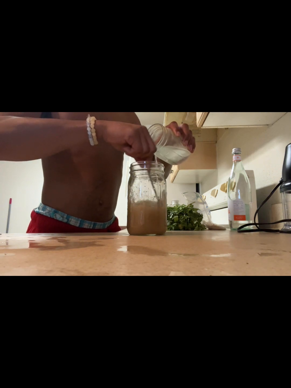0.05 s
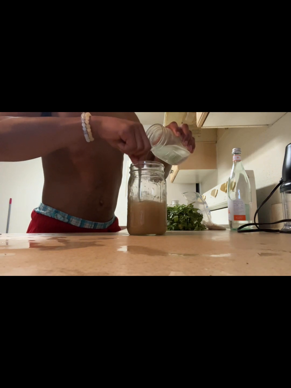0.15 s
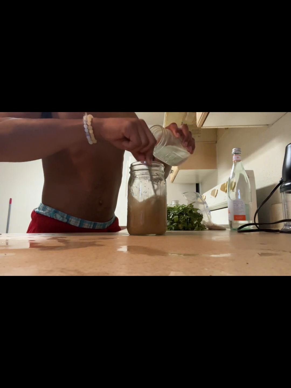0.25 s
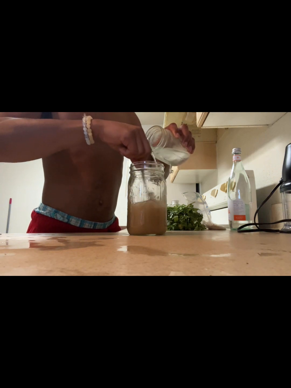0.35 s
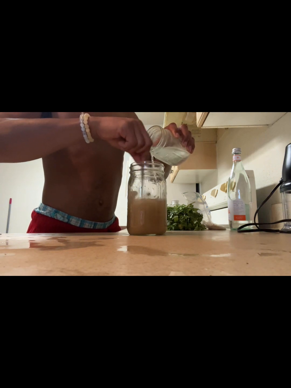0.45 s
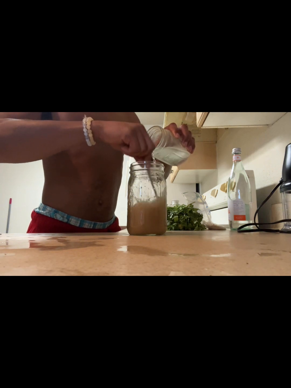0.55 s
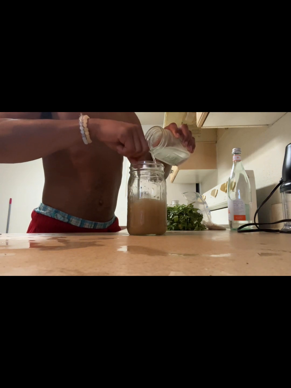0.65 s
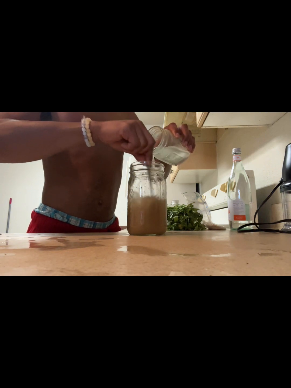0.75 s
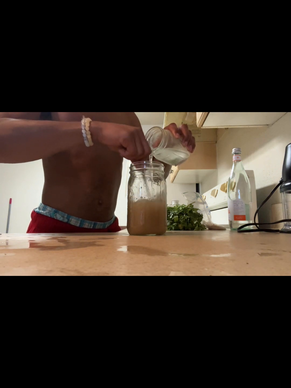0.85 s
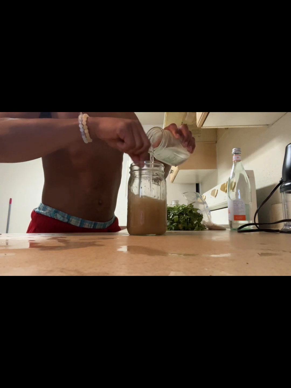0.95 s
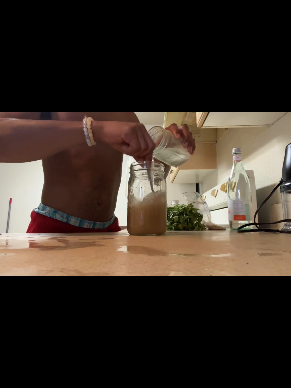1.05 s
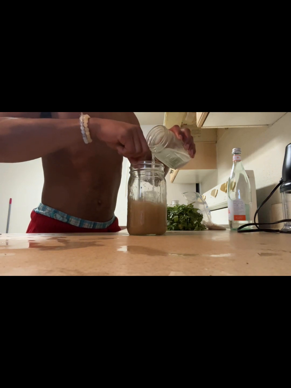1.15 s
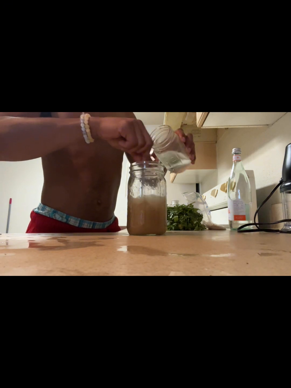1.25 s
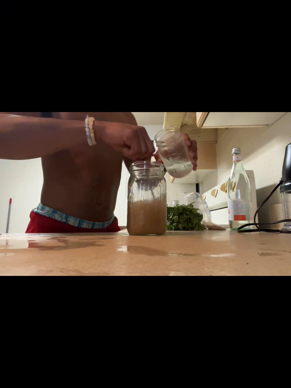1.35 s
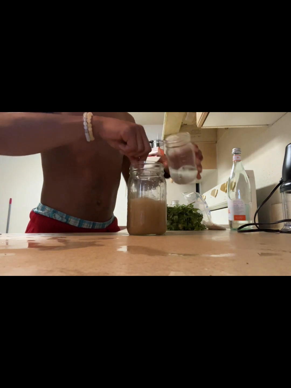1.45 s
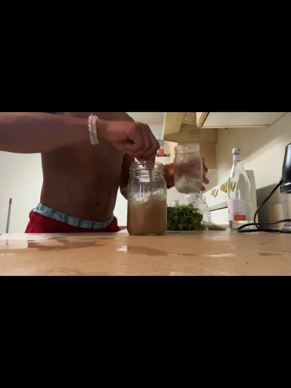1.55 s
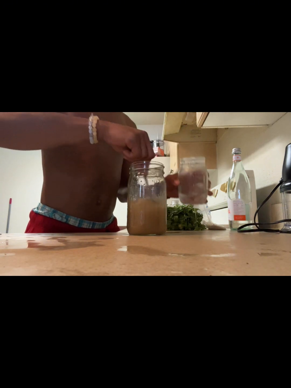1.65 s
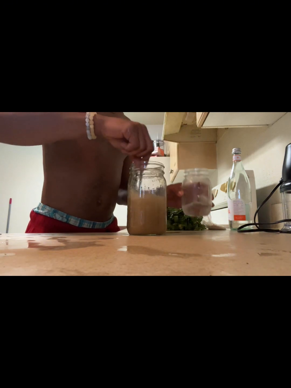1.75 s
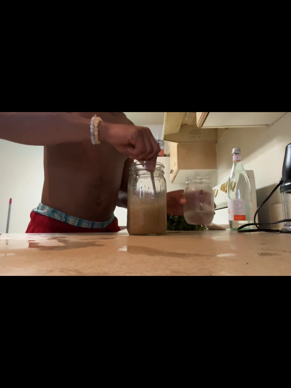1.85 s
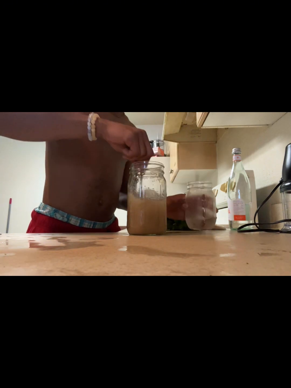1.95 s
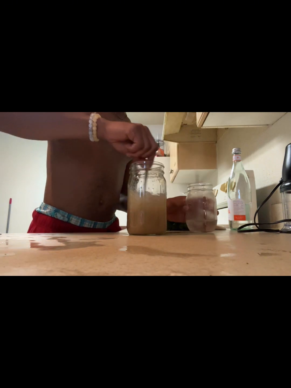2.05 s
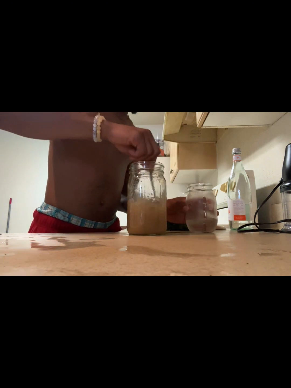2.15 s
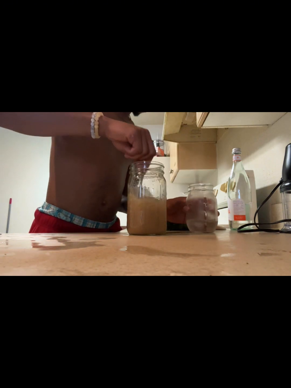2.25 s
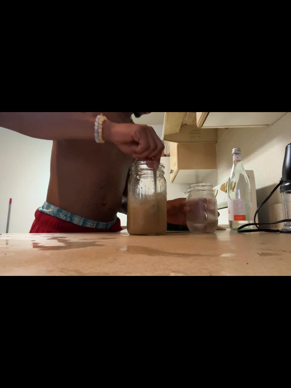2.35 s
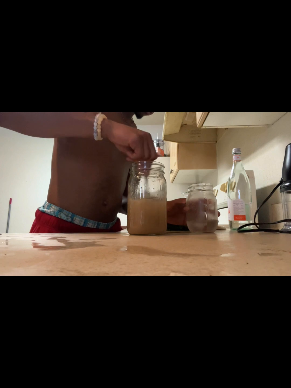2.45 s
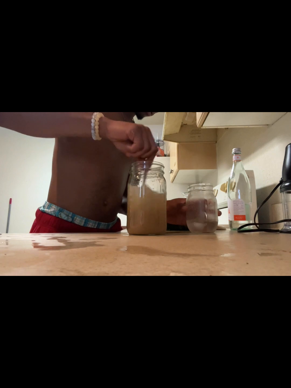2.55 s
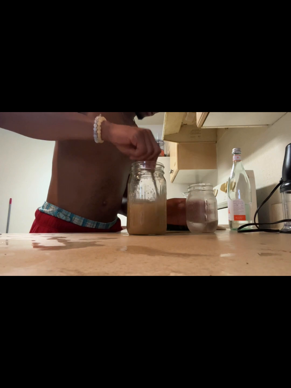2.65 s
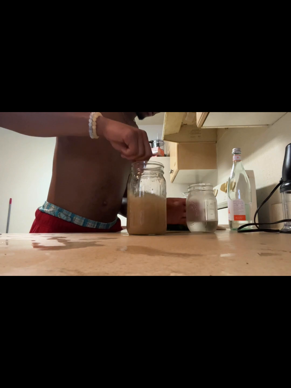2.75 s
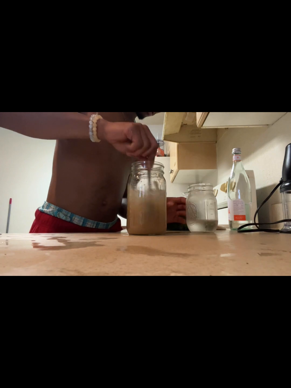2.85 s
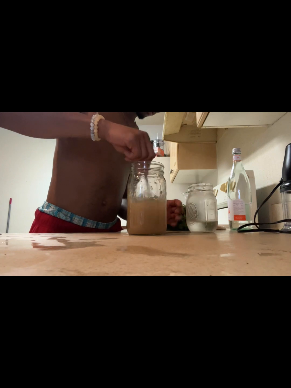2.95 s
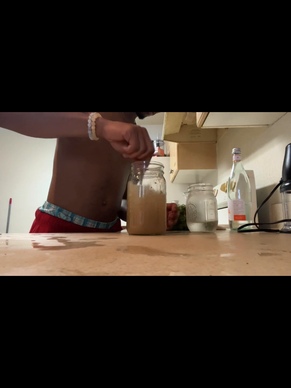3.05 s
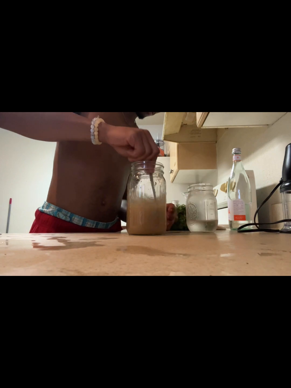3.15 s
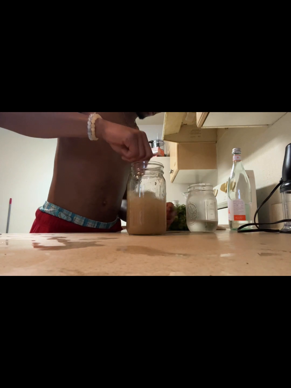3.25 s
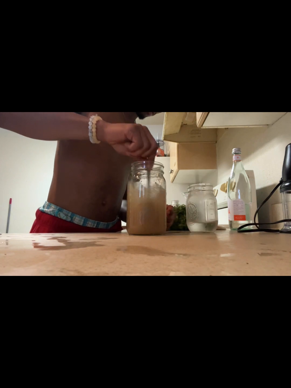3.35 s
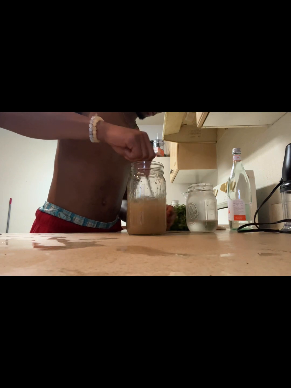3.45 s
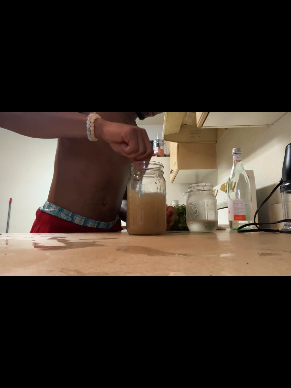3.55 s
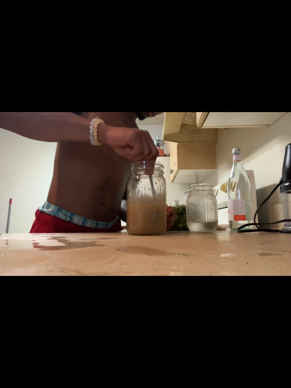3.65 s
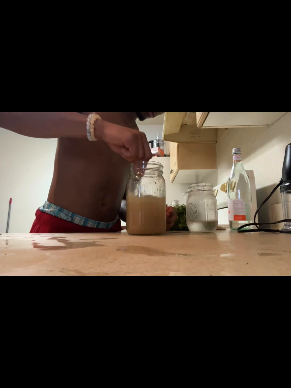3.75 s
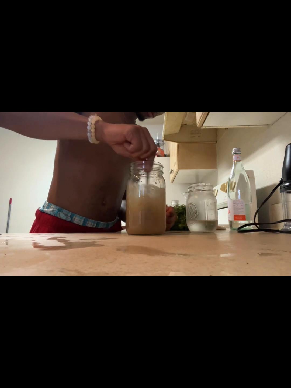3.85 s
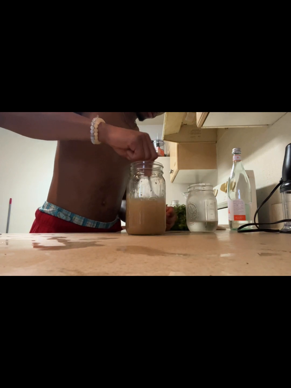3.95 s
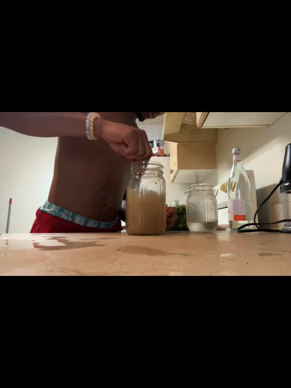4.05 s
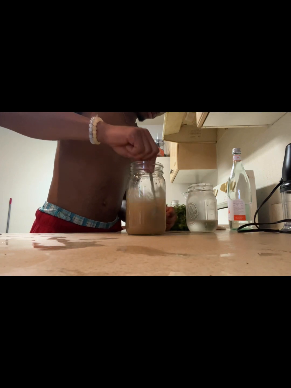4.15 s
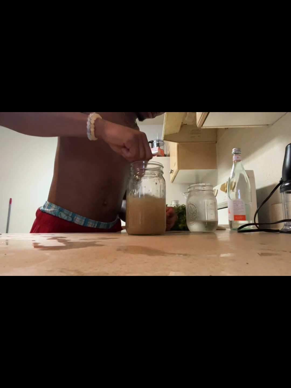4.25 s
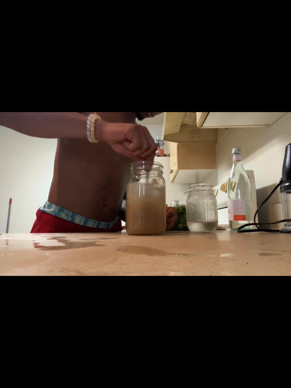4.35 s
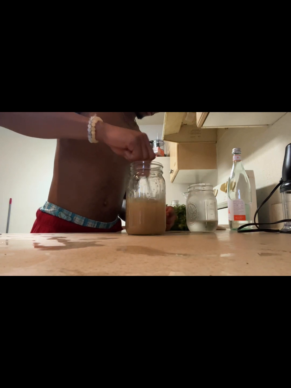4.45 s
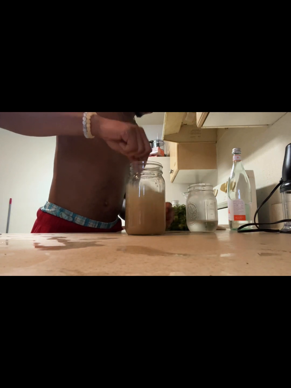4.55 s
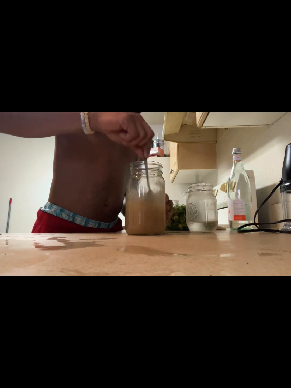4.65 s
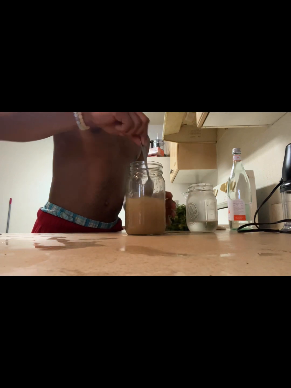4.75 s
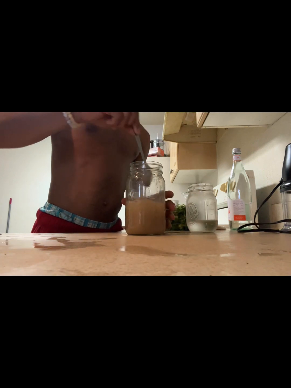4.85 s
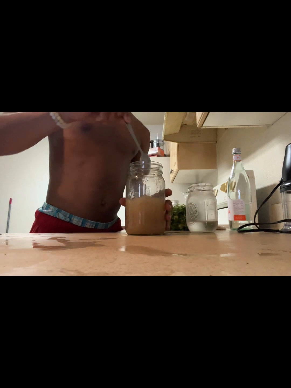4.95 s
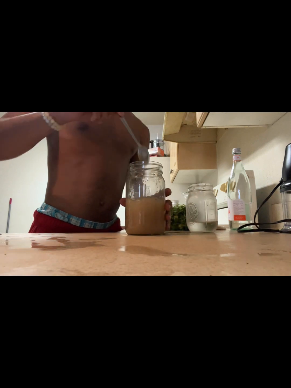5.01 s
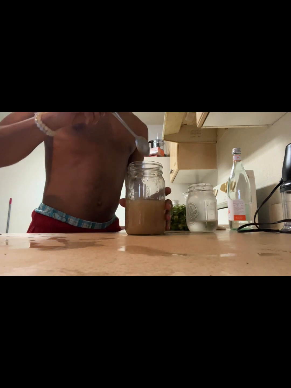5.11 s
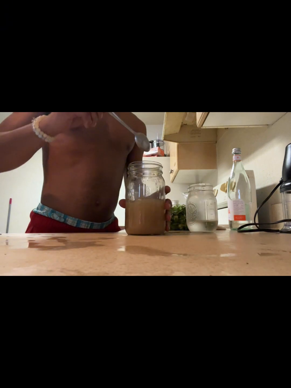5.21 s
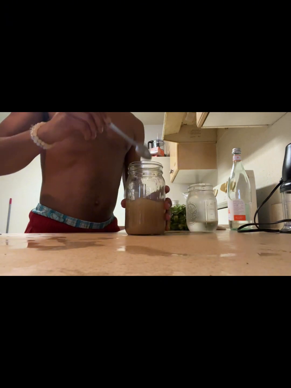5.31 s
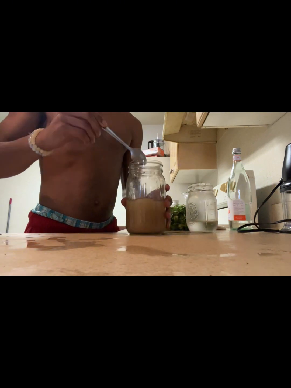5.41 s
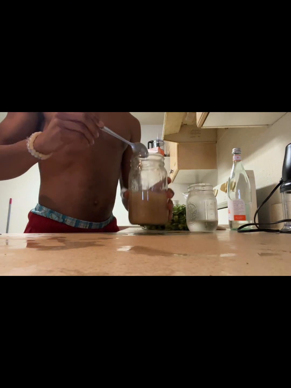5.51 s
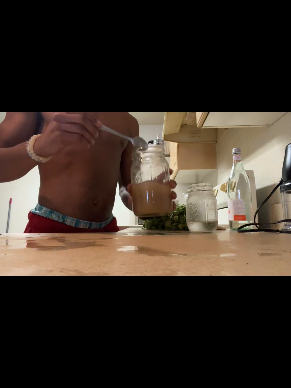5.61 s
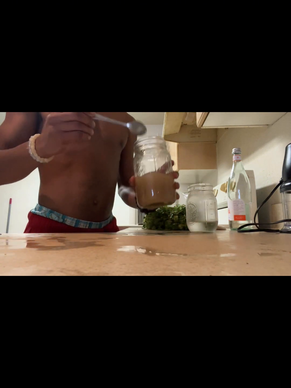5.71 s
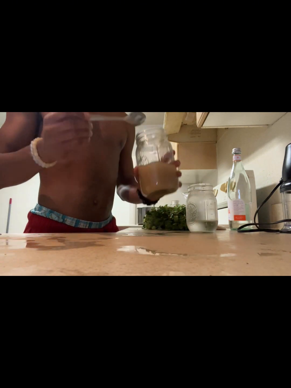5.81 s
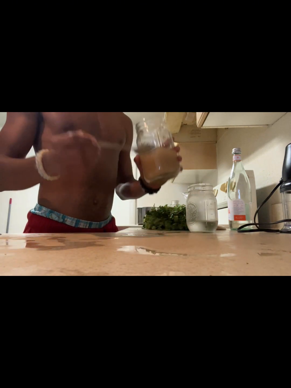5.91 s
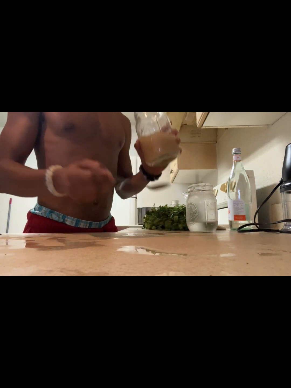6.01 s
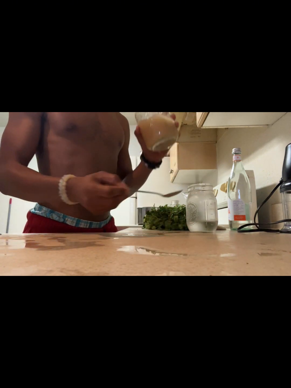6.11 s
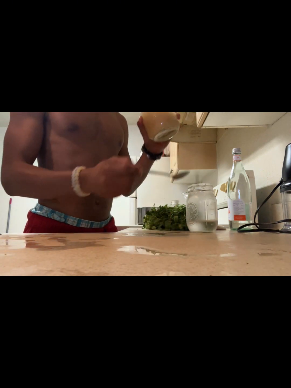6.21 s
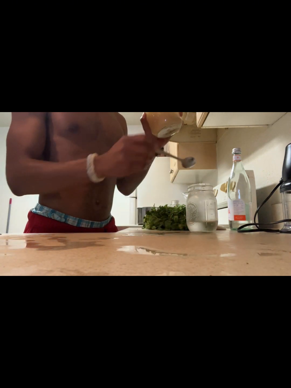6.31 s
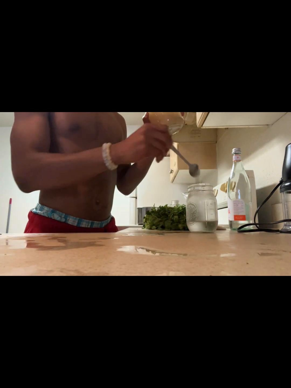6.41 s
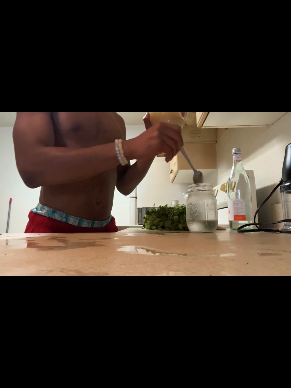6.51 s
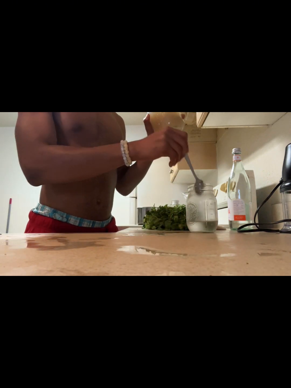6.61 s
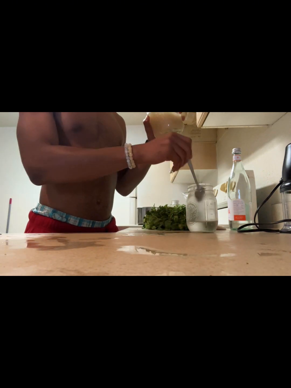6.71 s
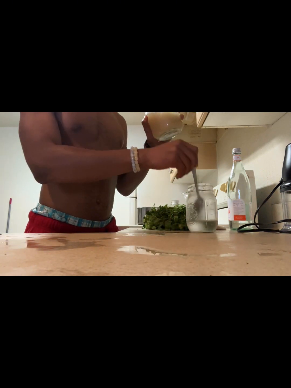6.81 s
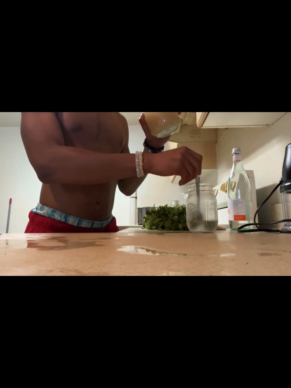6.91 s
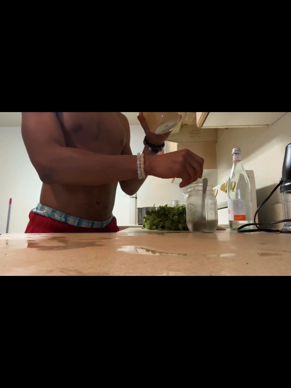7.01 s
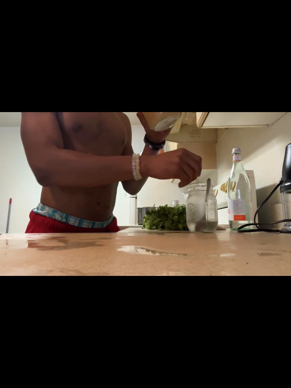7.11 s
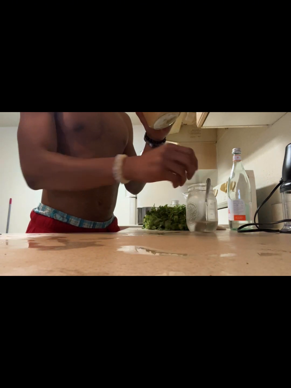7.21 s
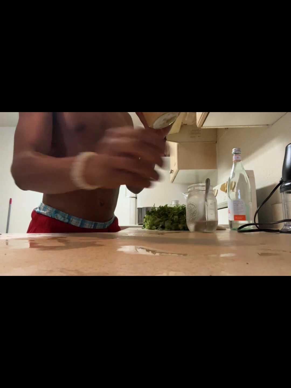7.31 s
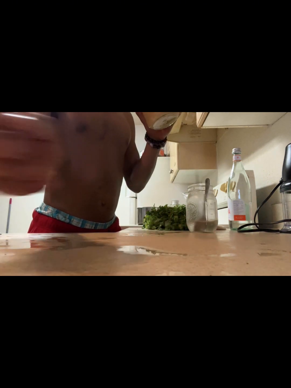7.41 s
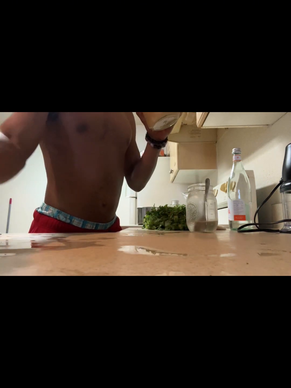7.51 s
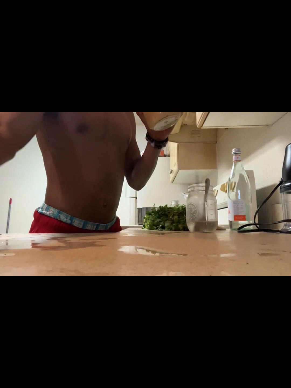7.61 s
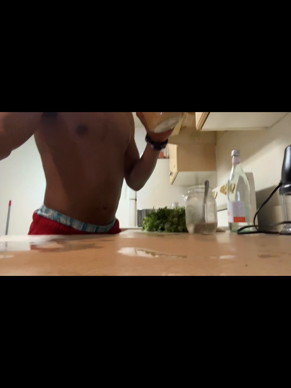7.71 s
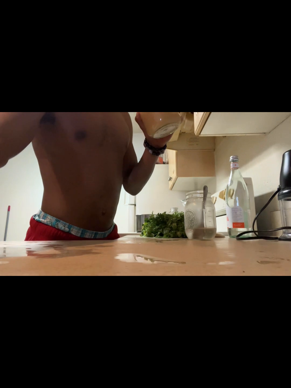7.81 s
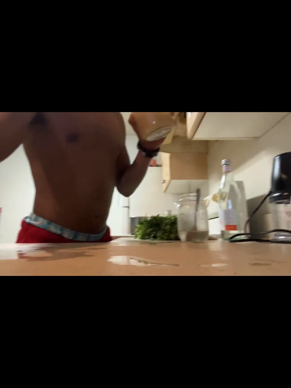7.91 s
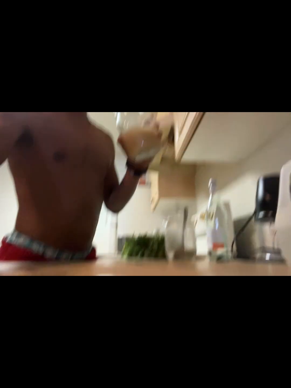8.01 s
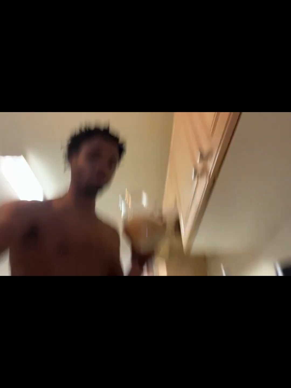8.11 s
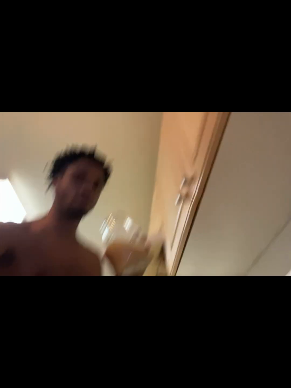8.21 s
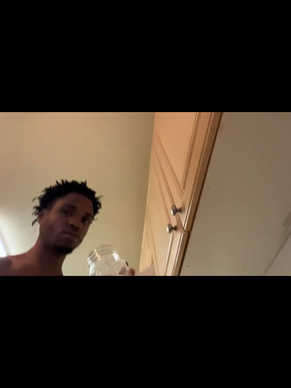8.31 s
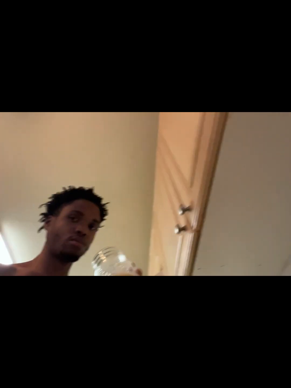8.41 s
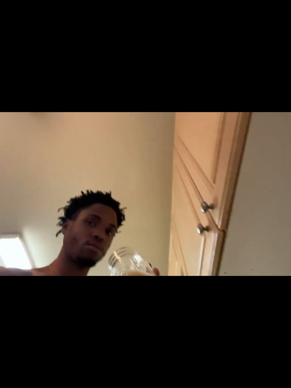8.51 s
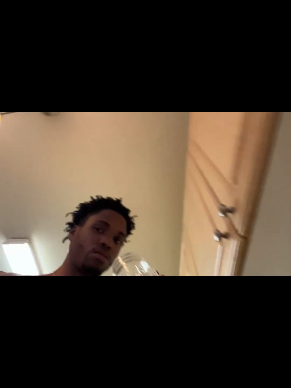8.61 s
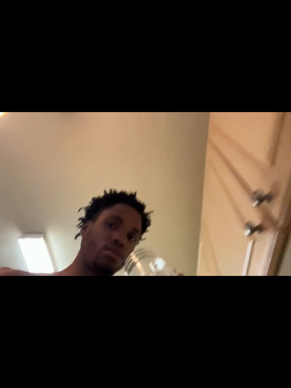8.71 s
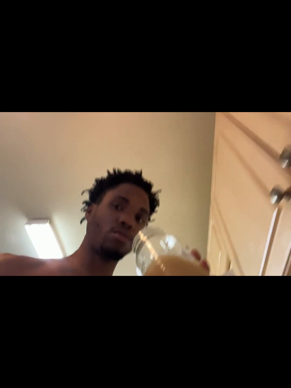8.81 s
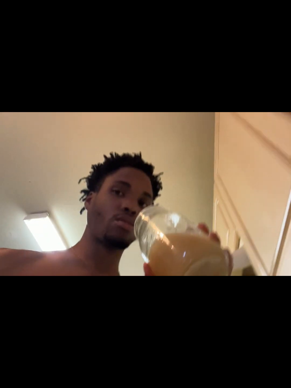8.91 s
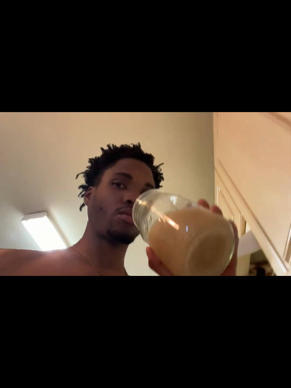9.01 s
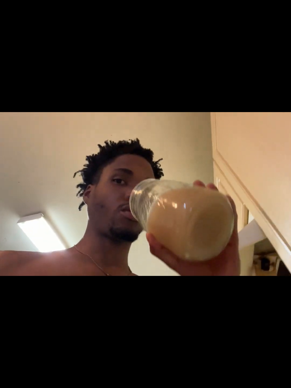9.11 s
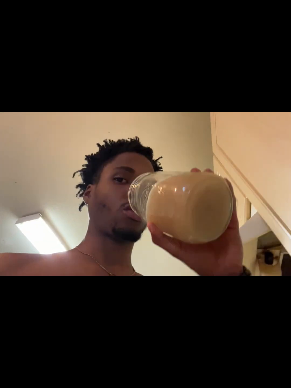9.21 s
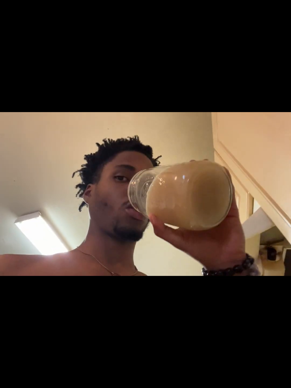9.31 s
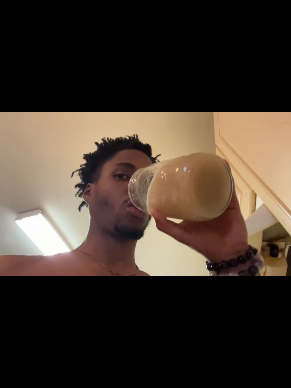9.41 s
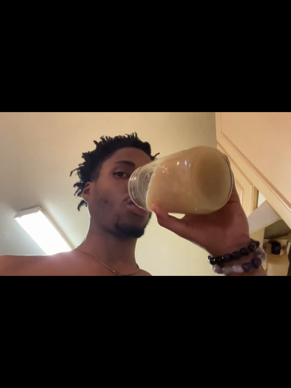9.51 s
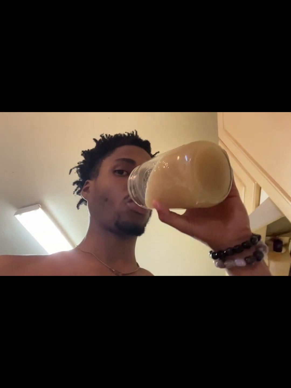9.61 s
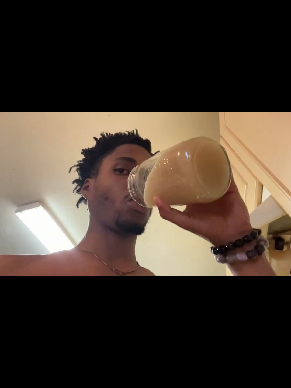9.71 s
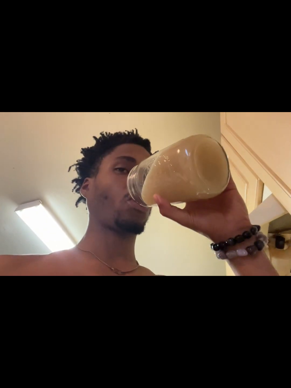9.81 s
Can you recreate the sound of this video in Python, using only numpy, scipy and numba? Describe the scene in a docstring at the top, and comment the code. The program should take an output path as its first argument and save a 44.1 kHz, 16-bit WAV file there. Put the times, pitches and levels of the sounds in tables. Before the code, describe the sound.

A phone microphone resting on the counter hears short, damped glass clinks growing denser, gritty scraping and woody thuds as a jar of drink is stirred. A dull wet clunk and two clearer rim taps follow, then a near-quiet gap with low fridge hum. The spoon bounces brightly in an empty jar and is abruptly damped. Rough handling rubs and clicks come next, then soft room tone in the small kitchen.

```python
"""Heard first: a spoon stirring a thick drink in a glass jar on a kitchen counter, close to a phone on the same counter.
It clinks and scrapes on the damped glass, knocks through the counter, clunks up the wet wall, taps the rim,
then drops into an empty jar and rattles; a hand drags the phone up off the counter. Blows ring banks of decaying
modes, friction is shaped noise, knocks are falling thumps. Behind it a fridge hums in the small hard room.
Two microphones hear the jars, the case and the air, each with its own balance, likeness and phase."""
import sys
import numpy as np
from scipy import signal
from scipy.fft import rfft, irfft, next_fast_len
from scipy.io import wavfile
from scipy.ndimage import uniform_filter1d, minimum_filter1d
from numba import njit

SR = 44100
rng = np.random.default_rng(int(sys.argv[2]) if len(sys.argv) > 2 else 0)


def generate_wav(sig):
    """Save sig (samples, or channels by samples) to the path in sys.argv[1] as 16-bit PCM at SR."""
    pcm = np.round(np.clip(np.atleast_2d(sig).T, -1, 1) * 32767).astype(np.int16)
    wavfile.write(sys.argv[1], SR, pcm)


N = 434815
T = np.arange(N) / SR
M = next_fast_len(N)
HZ = np.fft.rfftfreq(M, 1 / SR)


def undb(db):
    """Amplitude factor of a level in dB."""
    return 10 ** (np.asarray(db) / 20)


def unit(x):
    """The same sound at rms 1."""
    return x / np.sqrt(np.mean(x ** 2))


def filtered(x, response):
    """Multiply the spectrum of x by a response given at HZ."""
    return irfft(rfft(x, M) * response, M)[:, :N]


def over_hz(table):
    """A table of (hz, value) read on a log-frequency axis."""
    hz, value = np.transpose(table)
    return np.interp(np.log(HZ + 20), np.log(hz + 20), value)


def noise(gain):
    """Two unrelated noises of one colour, rms 1."""
    return unit(filtered(rng.standard_normal((2, M)), gain))


def band(lo_hz, hi_hz):
    """Gain of a smooth band between two edges."""
    return 1 / np.sqrt((1 + (lo_hz / (HZ + 1)) ** 8) * (1 + (HZ / hi_hz) ** 8))


def walk(rate_hz):
    """Random levels held for 1 / rate_hz seconds, then slewed; spread near 1."""
    hold = int(SR / rate_hz)
    steps = np.repeat(rng.standard_normal(N // hold + 1), hold)
    return uniform_filter1d(steps, hold)[:N]


def add(out, start_s, wave):
    """Mix a short stereo wave into out."""
    i = int(start_s * SR)
    out[:, i:i + wave.shape[1]] += wave[:, :N - i]


@njit
def ring(x, hz, gain, t60):
    """A bank of decaying modes driven by x."""
    y = np.zeros(len(x))
    for k in range(len(hz)):
        turn = np.exp((2j * np.pi * hz[k] - np.log(1000) / t60[k]) / SR)
        state = 0j
        for i in range(len(x)):
            state = state * turn + x[i] + 1e-18
            y[i] += gain[k] * state.imag
    return y


# colour of spoon-on-glass contact noise: hz, level_db (density per Hz)
CONTACT_COLOUR = [(240, -34.5), (400, -7.5), (719, 5), (1060, -4.5), (1440, -10), (1820, -0.5),
                  (2120, -6.5), (2550, -4), (3420, -10.5), (4050, -15.5), (6850, -16.5), (9320, -43.5),
                  (16000, -60)]


def strikes(events, modes, swell_s, contact_s, crack_db, tail_t60, scatter_db, detune, focus_db,
            length_s, damping_db, skip_db):
    """Each blow starts softly, lands elsewhere and chatters for a few ms: new mode strengths, a detune, contact noise."""
    hz, db, t60 = np.transpose(modes)
    lead = 220  # samples of soft onset before the peak
    t = np.arange(-lead, int(length_s * SR)) / SR
    after = np.maximum(t, 0)
    edges = [(400, 1250), (1250, 3700), (3700, 16000)]  # low, middle, high part in Hz
    parts = np.zeros((3, 2, N))
    cracks = [noise(undb(over_hz(CONTACT_COLOUR)) * band(*e)) for e in edges]
    swell = np.exp(np.minimum(t, 0) / swell_s - after / contact_s)
    chatter = swell + 0.64 * (after / 0.00029) * np.exp(1 - after / 0.00037)
    drag = np.minimum(after / contact_s, 1) * undb(-60 * after / tail_t60)
    grain = undb(skip_db * walk(180))  # the spoon skips along in uneven small contacts
    for start_s, peak_db, low_db, high_db, ring_hz in events:
        i = int(start_s * SR) - lead
        here = slice(i, i + len(t))
        skips = drag * grain[here]
        burst = undb(crack_db) * (chatter + 0.22 * skips)
        blows = (chatter + 0.11 * skips) * rng.standard_normal((2, len(t)))
        blows += 6.1 * (t == 0)  # one hard impulse at the peak
        pitch_chance, level_chance, damping_chance = rng.standard_normal((3, len(hz)))
        lasts = t60 * undb(damping_db * damping_chance)  # each blow finds the modes damped differently
        octaves = np.abs(np.log2(hz / ring_hz))
        struck = octaves == octaves.min()
        # the other modes move at random; those near the struck one ring loudest
        tuned = np.where(struck, ring_hz, hz * (1 + detune * pitch_chance))
        part_levels, focuses = (low_db, 0, high_db), (0, focus_db, 0.88 * focus_db)
        for out, (lo, hi), crack, part_db, focus in zip(parts, edges, cracks, part_levels, focuses):
            m = (hz >= lo) & (hz < hi)
            gain = undb(db + scatter_db * level_chance * ~struck - focus * octaves)
            tone = np.array([ring(blow, tuned[m], gain[m], lasts[m]) for blow in blows])
            wave = tone / np.abs(tone).max() + burst * crack[:, here]
            out[:, here] += wave * undb(peak_db + part_db) / np.abs(wave).max()
    # each part keeps to its own range, with soft skirts beyond its edges
    return sum(filtered(out, band(lo / 3.0, hi * 1.7)) for out, (lo, hi) in zip(parts, edges))


# spoon on the wall of the full jar, close by: start_s, middle part's peak_db,
# low_db and high_db (parts relative to the middle), strongest ring_hz
STIR_CLINKS = [(.0496, -33, 2, -7, 1860), (.0752, -25.5, 0, -5, 3120), (.118, -38, -18.5, -20, 3000),
               (.128, -54, -10, 8, 3820), (.17, -29.5, -32, -30, 3050), (.3208, -24.5, -1, -3.5, 2240),
               (.3691, -14.5, -6, -9, 1874), (.387, -16.5, -16, 0, 2530), (.4194, -34, 10, -17, 2140),
               (.5751, -29, 2, -2, 1810), (.627, -9, -16, -2, 1808), (.8199, -22.5, -2, -1.5, 1620),
               (.8868, -11.5, -29, 0.5, 1947), (.9483, -13.5, -10, -0.5, 1870),
               (1.1009, -34.5, 10.5, 0, 2940), (1.1342, -16, -21, 3.5, 2580),
               (1.1481, -16.5, -5.5, -6.5, 1900), (1.2047, -26.5, -10, 0, 1920),
               (1.258, -33, -9, -29, 1710), (1.3981, -9.5, -17, -3, 2480), (1.4611, -17, -6.5, 3.5, 2870),
               (1.4895, -31, -1, -25.5, 2150), (1.6312, -23, 1.5, -6, 3360), (1.699, -23, -1, 6.5, 2560),
               (1.7419, -10.5, -10, -3, 2900), (1.9116, -17.5, -6, -8.5, 1876),
               (1.933, -16, -6, -4.5, 1930), (1.952, -14, -5.5, 1.5, 2600), (1.9904, -16.5, -8, -15, 2820),
               (2.016, -22.5, -3.5, 5, 1830), (2.1854, -16.5, -6, -22.5, 1760),
               (2.1944, -12.5, -13, -3.5, 2530), (2.2129, -19, -6.5, 0, 2600),
               (2.2511, -17, -15, -4.5, 1880), (2.358, -21.5, -18.5, -12, 3040),
               (2.3649, -18.5, 5, -36.5, 1810), (2.4241, -19.5, -16, -13, 1855),
               (2.4583, -23.5, -12, -7, 2440), (2.4804, -13.5, -13, -2, 1830),
               (2.5147, -16.5, 3.5, -5.5, 1920), (2.5426, -21.5, -21, 0.5, 2540),
               (2.5716, -23.5, -7, -14, 1860), (2.607, -16.5, -11, -4, 1820),
               (2.6838, -22, -4.5, -40, 3120), (2.7222, -20.5, -1.5, -4, 1830),
               (2.7417, -18.5, -19.5, 4, 2970), (2.7741, -15, -8.5, 2, 3000),
               (2.7969, -18, -27.5, -12, 2600), (2.8729, -25, -2.5, -2.5, 1720),
               (2.9697, -12.5, -12, -6.5, 1833), (2.995, -15, -9, 2, 2600), (3.0227, -14.5, -4.5, -2, 1890),
               (3.0472, -20, -12.5, -4, 2560), (3.0789, -23.5, 0, -16.5, 1820),
               (3.1165, -18, -10, -6.5, 1480), (3.231, -9.5, -21.5, -8.5, 1820),
               (3.243, -12, -10, 2.5, 2600), (3.283, -19, -9, -1.5, 2600), (3.3722, -13.5, -4, -5.5, 2530),
               (3.476, -16.5, -14, -5.5, 1760), (3.491, -12.5, -8, -14, 1900), (3.51, -19, -11, 2.5, 2600),
               (3.5432, -16, 0.5, -2, 2920), (3.6084, -16, -8, -10, 2572), (3.7219, -9, -14, -9.5, 1760),
               (3.7399, -10.5, -26, -1, 2560), (3.7504, -17.5, 4.5, -5, 2540),
               (3.7876, -16, 3.5, -4.5, 1870), (3.826, -33.5, -16.5, -14, 2600),
               (3.8412, -12.5, -18, -18.5, 1836), (3.8859, -18, -10.5, -30, 1860),
               (3.9542, -21, -6, -7.5, 2930), (4.0059, -18, -7, 1, 1843), (4.0462, -24, 6.5, -5.5, 1800),
               (4.0912, -17.5, -26, -5.5, 1845), (4.1407, -22.5, 5, -5.5, 1790),
               (4.2268, -12.5, -6.5, -9.5, 1803), (4.2412, -18, -15.5, -1, 1716),
               (4.2583, -16, -0.5, 3, 3130), (4.2907, -19.5, -8.5, -8.5, 1730),
               (4.3142, -18.5, -5, 0.5, 2600), (4.3314, -30, -15, -6, 1680),
               (4.361, -24.5, -26.5, -21, 1760), (4.4554, -16.5, -6.5, -8, 1510),
               (4.5042, -15, 7.5, 2, 1790), (4.5361, -16, 3, -2, 1827)]
# modes of the jar damped by its drink: pitch_hz, level_db, t60_s
FULL_JAR_MODES = [(745, 4, .09), (830, -4, .06), (950, -7, .05), (1200, -9, .05), (1600, -6, .05),
                  (1840, 0, .08), (2200, -6, .05), (2510, -3, .05), (2640, -4, .045), (2940, -3, .05),
                  (3300, -6, .04), (3600, -4, .04), (3820, 0, .035), (4250, 0, .035), (4600, -3, .035),
                  (4900, -3, .035), (5300, -4, .035), (5840, -4, .04), (6320, -5, .04), (6800, -7, .06),
                  (7300, -12, .05)]


def stirring_clinks():
    """Blows on the loaded glass: short rings focused on the struck mode, with a gritty edge."""
    return strikes(STIR_CLINKS, FULL_JAR_MODES, swell_s=0.0013, contact_s=0.0049, crack_db=-9.5,
                   tail_t60=0.21, scatter_db=4.0, detune=.04, focus_db=22.5, length_s=.16,
                   damping_db=2., skip_db=5.5)


# how hard the spoon drags round glass and drink: time_s, scrape level_db
DRAG_EFFORT = [(0, -41.5), (.4, -56.5), (1.05, -39.5), (1.6, -49.5), (2.15, -42), (3.5, -46), (4.0, -40),
               (4.5, -39.5), (4.65, -49), (4.95, -77)]
FIRST_TURN_S, TURN_S, TURN_DB = .45, .258, 4  # the drag swells once on each turn of the spoon


def scrape_db():
    """Level of the drag: effort with a swell on each turn."""
    swell = TURN_DB * np.cos(2 * np.pi * (T - FIRST_TURN_S) / TURN_S)
    return np.interp(T, *np.transpose(DRAG_EFFORT), right=-120) + swell


RUMBLE_DB, RUMBLE_FOLLOWS = -42.5, 0.66  # counter rumble at a scrape of -45 dB, dB per dB


def stirring_scrape():
    """Tiny uneven slips ring the full jar over a wet hiss; the counter rumbles along."""
    drag_db = scrape_db()
    hz, db, t60 = np.transpose(FULL_JAR_MODES)
    slip_now = rng.random((2, N)) < 400. / SR  # about 400 slips a second
    slips = slip_now * undb(6 * rng.exponential(size=(2, N)))
    tilted = undb(db - 1.7 * np.log2(hz / 1800))
    glass = unit(np.array([ring(x, hz, tilted, t60) for x in slips]))
    hiss = noise(undb(over_hz(CONTACT_COLOUR))) * undb(3 * walk(60))
    rumble_colour = [(30, -20.5), (70, 20.5), (115, 18.0), (180, 2.0), (290, 18.0), (450, -4.5),
                     (720, -14.0), (1000, -40.5)]  # hz, level_db
    rumble = noise(undb(over_hz(rumble_colour)))
    scrape = undb(-7.0) * glass + undb(-5.5) * hiss
    rumble_db = RUMBLE_DB + RUMBLE_FOLLOWS * (drag_db + 45) + 3 * walk(30)
    return undb(drag_db) * scrape + undb(rumble_db) * rumble


# short dull low rings of the loaded glass: start_s, main tone's level_db, pitch_hz
DULL_TONES = [(0.187, -31.5, 873), (0.417, -31, 758), (0.827, -31, 752), (0.98, -31, 700),
              (1.012, -36.5, 688), (1.104, -32.5, 789), (1.153, -31, 705), (1.209, -33.5, 880),
              (1.763, -23.5, 713), (2.202, -25.5, 700), (2.499, -25.5, 623), (2.616, -34, 730),
              (3.371, -18.5, 970), (3.562, -25, 904), (4.046, -26.5, 754), (4.508, -19.5, 710)]
DULL_CYCLES = 12  # sets the swell: it peaks after a third of these cycles


def dull_rings():
    """Each low ring swells over a few cycles and dies, roughened by a neighbouring tone."""
    out, t = np.zeros((2, N)), np.arange(int(.08 * SR)) / SR
    for start_s, level_db, hz in DULL_TONES:
        age = 3 * t * hz / DULL_CYCLES
        rough_hz = hz * (1.1 + 0.093 * rng.standard_normal())
        tone = np.sin(2 * np.pi * hz * t) + 0.53 * np.sin(2 * np.pi * rough_hz * t)
        add(out, start_s, np.outer([1, -1], tone * age * np.exp(1 - age)) * undb(level_db))
    return out


# the jar rocks and knocks on the counter: start_s, thump's peak_db,
# pitch_hz (nominal: the thump falls from 2.1 to 0.9 times it), slap_db (glass base relative to the thump)
JAR_KNOCKS = [(0.187, -31, 317.2, -8), (0.67, -21.5, 314, -15), (.92, -13, 287.4, -13.5),
              (1.191, -19, 325, -12.5), (1.374, -28.5, 311.3, -27.5), (1.465, -20.5, 308.6, -5.5),
              (1.761, -16.5, 346.6, -14), (1.828, -27.5, 332, -3.5), (1.99, -18, 570, -16),
              (2.096, -3, 263.6, -6.5), (2.257, -17.5, 282.6, -15.5), (2.365, -10.5, 272.6, -9.5),
              (2.509, -12, 321.3, -14.5), (2.764, -12.5, 297, -14), (2.978, -24.5, 716, -6.5),
              (3.023, -12, 326.5, -9), (3.138, -8, 698, -8.5), (3.27, -20.5, 331, -11),
              (3.546, -29, 632.6, -14.5), (3.757, -10, 321.3, -10), (3.785, -11.5, 250, -17),
              (3.902, -11, 497, 5), (3.97, -20, 715, -15), (4.011, -22.5, 590, -18),
              (4.153, -10, 245.5, -0.5), (4.275, -12, 783, -10), (4.4, -13, 298, -7),
              (4.521, -9.5, 477.6, -1.5), (4.994, -32, 318, -25), (5.108, -35.5, 302.5, -25),
              (5.215, -25.5, 274.4, -19.5), (5.38, -24, 299.8, -14), (6.84, -24, 482.3, -16.5),
              (6.952, -11, 671, 6.5)]
# modes of the counter: pitch_hz, level_db, t60_s
COUNTER_MODES = [(66, -24.5, 0.22), (118, -19.5, 0.22), (289, -4, 0.094), (570, -0.5, 0.044)]
THUD_HZ, THUD_DB, THUD_T60_S = (88, 419), -11.5, 0.12  # the counter's dull shudder under each knock
SLAP_HZ, SLAP_T60_S = (414, 1900), 0.048


def counter_knocks():
    """A soft push: a falling thump, as the counter brings the lows late, and the counter's own modes."""
    out, t = np.zeros((2, N)), np.arange(int(.3 * SR)) / SR
    hz, db, t60 = np.transpose(COUNTER_MODES)
    grit, shudder = noise(band(*SLAP_HZ)), noise(band(*THUD_HZ))
    swell = (1 - np.exp(-t / 0.0049)) ** 2
    push = 1. * (t == 0)
    for start_s, peak_db, pitch_hz, slap_db in JAR_KNOCKS:
        turns = np.cumsum(pitch_hz * (.9 + 1.2 * np.exp(-t / .003))) / SR
        sides = []
        for chance in rng.standard_normal((2, len(hz) + 1)):
            thump = undb(-60 * t / 0.052) * np.sin(2 * np.pi * turns + chance[-1])
            modes = ring(push, hz * (1 + 0.14 * chance[:-1]), undb(db + 2.0 * chance[:-1]), t60)
            sides.append(swell * (thump + modes))
        wave = np.array(sides)
        i = int(start_s * SR)
        slap = grit[:, i:i + len(t)] * np.minimum(t / 0.0026, 1) * undb(-60 * t / SLAP_T60_S)
        thud = shudder[:, i:i + len(t)] * swell * undb(THUD_DB - 60 * t / THUD_T60_S)
        knock = wave / np.abs(wave).max() + thud + undb(slap_db) * slap / np.abs(slap).max()
        add(out, start_s, undb(peak_db) * knock)
    return out


# the lifted spoon on the wet wall: start_s, middle part's peak_db, low_db, high_db, strongest ring_hz
WALL_CLUNKS = [(5.0235, -12.5, -22, -35, 1790), (5.0315, -16.5, -18, -34, 2250),
               (5.043, -21.5, -10, -37, 2100), (5.165, -44, -11, -34, 1790), (5.33, -46.5, -8, -59, 1900)]
# the drained wall under its film of drink: pitch_hz, level_db, t60_s
WET_WALL_MODES = [(820, -3, .06), (1220, 3, 0.072), (1455, -12, 0.051), (1640, -6, .06), (1695, 1, 0.055),
                  (1790, 9.5, 0.057), (1860, 7, 0.092), (2100, -2, .05), (2310, -0.5, 0.055),
                  (2700, -17, .05), (3150, -23, .04), (4150, 8, 0.045), (4870, -12, .04)]


def lifted_spoon():
    """The lifted spoon clunks along the wet wall: longer contacts, dull short modes."""
    return strikes(WALL_CLUNKS, WET_WALL_MODES, swell_s=0.0015, contact_s=0.01, crack_db=-22.0,
                   tail_t60=.1, scatter_db=3.5, detune=0.023, focus_db=3.5, length_s=0.27,
                   damping_db=0, skip_db=6.0)


# spoon tapped on the rim above the drink: start_s, middle part's peak_db, high_db, strongest ring_hz
RIM_TAPS = [(5.39, -13.5, -15, 2600), (5.5365, -17, -12.5, 2540)]
# modes of the rim: pitch_hz, level_db, t60_s
RIM_MODES = [(583, -3, 0.13), (758, -9, 0.093), (1756, 3, 0.11), (1760, -9, 0.4), (2105, -4, 0.12),
             (2540, -8.5, 0.25), (2570, -11, 0.41), (2613, 5.5, 0.05), (4600, -37, .35), (6240, -8, 0.065),
             (6780, -11, 0.45), (6780, 11.5, 0.047), (7500, -30, 0.25)]
TAP_LOW_DB = -13.5


def rim_taps():
    """Above the drink the glass rings freer and longer, with little detune."""
    taps = [(start_s, db, TAP_LOW_DB, high_db, hz) for start_s, db, high_db, hz in RIM_TAPS]
    return strikes(taps, RIM_MODES, swell_s=0.002, contact_s=0.0049, crack_db=-14.0,
                   tail_t60=0.48, scatter_db=2.0, detune=0.0015, focus_db=0.5, length_s=0.6,
                   damping_db=1, skip_db=2.5)


# spoon dropped in the empty jar, bouncing: start_s, middle part's peak_db, low_db, high_db
DROP_HOPS = [(6.8331, -15.5, -10.5, -15), (6.854, -15, -28, -22), (6.9497, -13.5, 6.5, 5.5),
             (6.9748, -22, -9, 1.5), (6.9942, -15.5, -9, -9.5), (7.029, -20.5, -2, 3.5),
             (7.042, -18, -11, -6), (7.0572, -23.5, 2.5, -8.5), (7.091, -21.5, -9, -9.5),
             (7.105, -28.5, -0.5, 5), (7.128, -22, -18.5, -13.5), (7.145, -24, -17.5, -15.5)]
# modes of the empty jar: pitch_hz, level_db, t60_s
EMPTY_JAR_MODES = [(508, -3, .08), (784, -2.5, 0.067), (861, -3, 0.069), (1010, -3, 0.032),
                   (2050, -13, .07), (2475, -13, .12), (2941, -1, 0.3), (2981, 4.5, .36), (3580, -12, 0.1),
                   (4150, -17, 0.22), (4650, -14, .08), (5358, -5, 0.28), (5330, -6, 0.1), (5724, -10, .35),
                   (5770, -12.5, 0.12), (6382, -6, 0.07), (6778, -10, 0.2), (7249, -9, .22),
                   (7310, -12, 0.2), (8600, -17, .08), (8936, -22, .2), (9200, -19, 0.06)]
RATTLE_HZ = 2981  # strongest ring of every hop
REST_S, REST_DB = 7.172, -13  # the spoon comes to lean on the glass and damps the ring


def dropped_spoon():
    """Bounces ring the undamped empty jar until the leaning spoon lowers its level."""
    hops = [(*hop, RATTLE_HZ) for hop in DROP_HOPS]
    rattle = strikes(hops, EMPTY_JAR_MODES, swell_s=0.0012, contact_s=0.0043, crack_db=-20.5,
                     tail_t60=0.29, scatter_db=4.5, detune=0.001, focus_db=8.0, length_s=.4,
                     damping_db=0, skip_db=4.)
    return rattle * undb(REST_DB * np.clip((T - REST_S) / 0.013, 0, 1))


# hand and counter rubbing on the phone's case, at the microphones: start_s, length_s,
# start_db, end_db (middle part), low_db, high_db (relative to the middle)
CASE_RUBS = [(5.899, 0.028, -53, -55, 4.5, -39), (7.664, .055, -37.5, -44, 11, -22),
             (7.735, 0.04, -15.5, -15.5, -4, -36), (7.897, .03, -29.5, -17, -5, -46.5),
             (7.926, .075, -20.5, -17, -7, -43), (7.999, 0.15, -15, -17.5, -16, -60),
             (8.165, .06, -51, -44.5, -11.5, -37.5), (8.247, 0.12, -24.5, -22.5, -18, -74.5),
             (8.574, 0.072, -66.5, -57, -1.5, -43)]
RUB_RISE_DB_PER_S, RUB_FALL_DB_PER_S = 1100.5, 1202


def rub_db():
    """Level of the middle, low and high part: each rub rises, holds and falls; the loudest one counts."""
    out = np.full((3, N), -120.)
    for start_s, length_s, start_db, end_db, low_db, high_db in CASE_RUBS:
        end_s = start_s + length_s
        db = np.interp(T, [start_s, end_s], [start_db, end_db])
        db -= RUB_RISE_DB_PER_S * np.maximum(start_s - T, 0)
        db -= RUB_FALL_DB_PER_S * np.maximum(T - end_s, 0)
        out = np.maximum(out, db + np.array([[0], [low_db], [high_db]]))
    return out


# resonances of the case: pitch_hz, width_hz, level_db
CASE_MODES = [(250, 180, 14.5), (618, 300, -0.5), (956, 380, 9), (1747, 260, 3), (2600, 380, -15),
              (4020, 320, -23), (7000, 1100, -32)]
# the case ticks under the fingers: start_s, tick's peak_db, low_db (soft bump relative to the tick)
CASE_TICKS = [(7.662, -29.5, -8), (7.689, -36, 0.5), (7.779, -14, -11.5), (7.79, -30, 12),
              (7.923, -12.5, -4.5), (8.257, -8, -10), (8.685, -26, -19)]


def handling():
    """Stick-slip friction shakes the case resonances; single ticks ring them once."""
    grit = rng.standard_normal((2, N)) * undb(3.2 * walk(250) + 1.6 * walk(40))
    peaks = [undb(db) / np.sqrt(1 + ((HZ - hz) / (width / 2)) ** 4) for hz, width, db in CASE_MODES]
    low = peaks[:1] + [undb(-14.5) * band(50, 220)]
    parts = [unit(filtered(grit, sum(group))) for group in (peaks[1:5], low, peaks[5:])]
    out = sum(part * undb(db) for part, db in zip(parts, rub_db()))
    hz, width, db = np.transpose(CASE_MODES)[:, 1:]
    t = np.arange(int(.1 * SR)) / SR
    tilted = undb(db + 1.5 * np.log2(hz / 1000))
    tick = ring(np.exp(-t / .0001), hz, tilted, 1.4 / width ** 0.73)  # wider modes die sooner
    tick /= np.abs(tick).max()
    bump = np.sin(2 * np.pi * 170 * t * np.exp(-t / 0.089)) * undb(-60 * t / 0.052)
    for start_s, peak_db, low_db in CASE_TICKS:
        add(out, start_s, np.tile(undb(peak_db) * (tick + undb(low_db) * bump), (2, 1)))
    return out


# colour of the kitchen air while the counter carries it to the phone: hz, level_db (density per Hz)
COUNTER_AIR = [(12, -60), (20, -30), (36, -19.5), (60, 5.5), (77, -6), (88, -13.5), (110, -10),
               (234, -11.5), (328, -24.5), (367, -22), (759, -25), (1150, -25), (3160, -46.5),
               (3930, -42.5), (4900, -58.5), (7300, -62), (8000, -46), (9000, -62), (16000, -84)]
# colour of the kitchen air with the phone in the hand: hz, level_db (density per Hz)
HAND_AIR = [(12, -64), (20, -34.5), (32, -16.5), (48, -5), (68, 2), (91, -6), (177, -21.5), (607, -37),
            (759, -40.5), (1810, -39.5), (3340, -55), (7730, -68), (16000, -56.5)]
ON_COUNTER_DB, IN_HAND_DB = -51, -55
# fridge motor lines: pitch_hz, mean level_db (rms)
FRIDGE_LINES = [(242, -63.5), (361, -69), (883, -77), (1184, -74.5), (7908, -92)]
# the held background dips after the loud rub: time_s, level_db (added to IN_HAND_DB)
HELD_DIP = [(0, -8), (8.36, -12.5), (8.43, -8.5), (8.56, -1.5)]
LIFT_S = 7.79


def kitchen():
    """Air and fridge as shaped noise and wavering sines; the motor's thin lines leave with the counter."""
    lifted = np.clip((T - LIFT_S) / 0.0748, 0, 1)
    hum = 0
    for hz, db in FRIDGE_LINES:
        hum = hum + undb(db + 4 * walk(25)) * np.sqrt(2) * np.sin(2 * np.pi * hz * T)
    standing = undb(ON_COUNTER_DB + 0.5 * walk(2.5)) * noise(undb(over_hz(COUNTER_AIR))) + hum
    held_db = IN_HAND_DB + np.interp(T, *np.transpose(HELD_DIP))
    held = undb(held_db) * noise(undb(over_hz(HAND_AIR)))
    return (1 - lifted) * standing + lifted * held


ROOM_T60_S, ROOM_DB = 0.44, -14.5


def room(x):
    """A dense tail from tiles and cupboards, different at each side."""
    t = np.arange(int(.6 * SR)) / SR
    tail = rng.standard_normal((2, len(t))) * undb(-60 * t / ROOM_T60_S) * np.minimum(t / 0.003, 1)
    tail /= np.sqrt(np.sum(tail ** 2) / 2)
    return undb(ROOM_DB) * signal.fftconvolve(x, tail, axes=1)[:, :N]


def microphones(pair, place):
    """Left and right hear one sound with their own level and phase, and share only part of it."""
    balance, like, lag, phase = place
    like = np.clip(over_hz(like), 0, .97)
    a, b = rfft(pair, M)
    left = undb(over_hz(balance) / 2)
    lead = over_hz(phase) - 2 * np.pi * HZ * lag / SR
    # dividing by the level of the half-sum keeps the colour of the mono mix
    mid = np.sqrt(left ** 2 + left ** -2 + 2 * like * np.cos(lead)) / 2
    left_side = a * left * np.exp(1j * lead)
    right_side = (like * a + np.sqrt(1 - like ** 2) * b) / left
    return irfft(np.array([left_side, right_side]) / mid, M)[:, :N]


# the two microphones' view of each place: (hz, left minus right level_db), (hz, likeness 0-1),
# lag_samples (left lags), (hz, phase_rad by which left leads, before the lag)
JAR_PLACE = ([(60, -1.0), (110, -1.5), (200, -0.5), (380, -2.5), (700, -3.0), (1290, 1.0), (2380, 6.0),
             (4400, 10.5), (8120, 9.5), (15000, -0.5)], [(60, .95), (170, .6), (500, .75), (1400, .4),
             (2800, .85), (6000, .6)], 21, [(0, 0), (60, .8), (130, 2.2), (170, 3.4), (230, 5.9), (320, 6),
             (430, 4.5), (600, 5.4), (800, 4.8), (2300, 5.1), (3000, 7.4), (5000, 6)])
CASE_PLACE = ([(60, -1.5), (110, -1.0), (200, -3.5), (380, -6.5), (700, -12.0), (1290, -16.0),
              (2380, -18.5), (4400, -9.0), (8120, 2.0), (15000, 0.5)], [(60, .6), (200, .95), (1900, .9),
              (2800, .3)], 21, [(0, 0), (200, -.6), (450, -.5), (600, -1.5), (1200, -2.1), (2000, -1.6),
              (2500, -.5), (4000, 1)])
AIR_PLACE = ([(60, -1.0), (110, -0.5), (200, 4.0), (380, 2.5), (700, 1.5), (1290, 5.5), (2380, 0.0),
             (4400, -4.0), (8120, 2.0), (15000, 0.0)], [(60, .95), (800, .85), (1200, .3), (7000, .3),
             (10000, .95)], 0, [(0, .3), (90, .6), (130, 1.4), (215, 2.6), (400, 3.7), (800, 4),
             (1000, 4.7), (8000, 3.1)])


def scene():
    """Everything at the jars, its room tail, the hand on the phone and the air, each from its own place."""
    blows = stirring_clinks() + rim_taps() + dropped_spoon() + lifted_spoon()
    jars = blows + counter_knocks() + stirring_scrape() + dull_rings()
    near = microphones(jars, JAR_PLACE)
    hand = microphones(handling(), CASE_PLACE)
    air = microphones(kitchen(), AIR_PLACE)
    return near + room(near) + hand + air


LIMIT, LIMIT_S = .96, .006  # peak amplitude, window
TOP_HZ = 16000


def record(dry):
    """The phone's deep bass and treble fall away; a quick limiter holds the loudest peaks; the top is cut."""
    soft = signal.sosfilt(signal.butter(6, [38., 8500.], "bandpass", fs=SR, output="sos"), dry)
    size = int(LIMIT_S * SR)
    gain = minimum_filter1d(LIMIT / np.maximum(np.abs(soft).max(0), LIMIT), size=size)
    limited = soft * uniform_filter1d(gain, size=size)
    return signal.sosfilt(signal.ellip(8, .2, 70, TOP_HZ, fs=SR, output="sos"), limited)


dry = scene()
out = record(dry)
generate_wav(out)
```